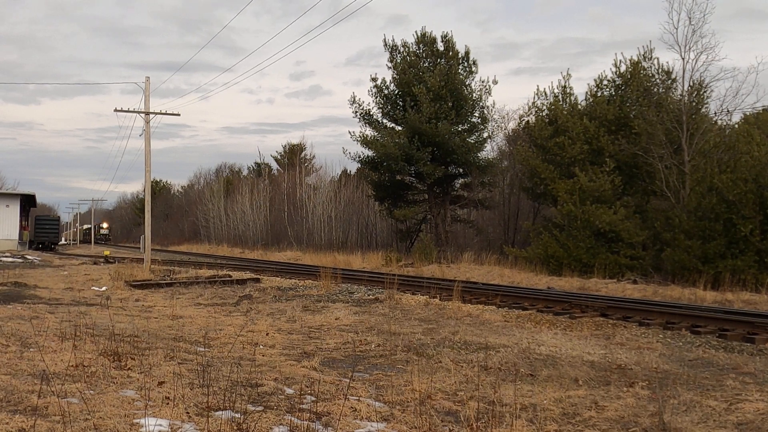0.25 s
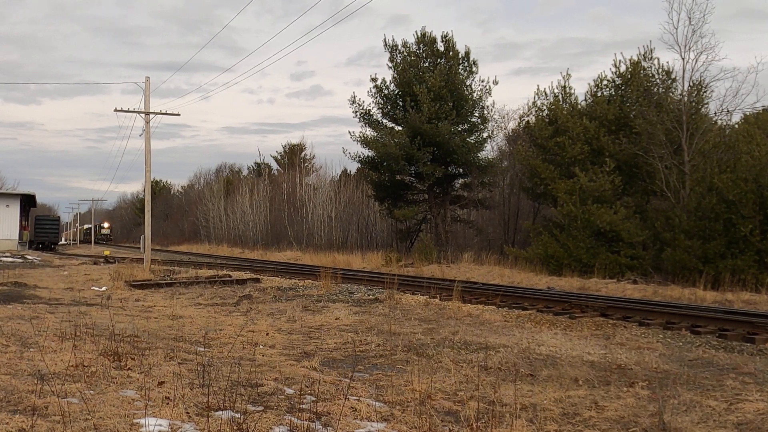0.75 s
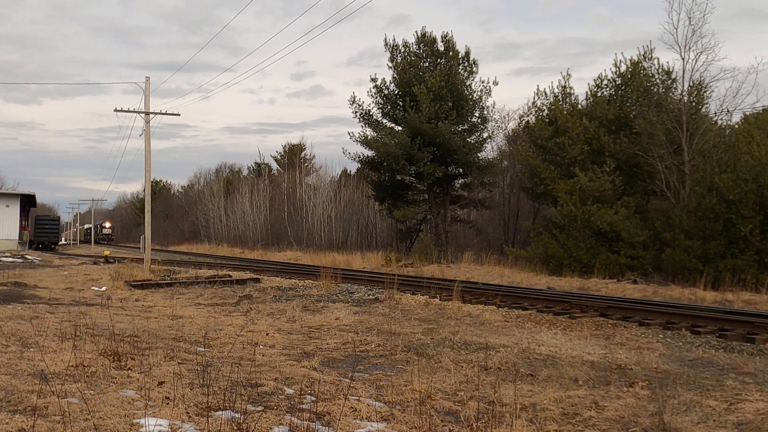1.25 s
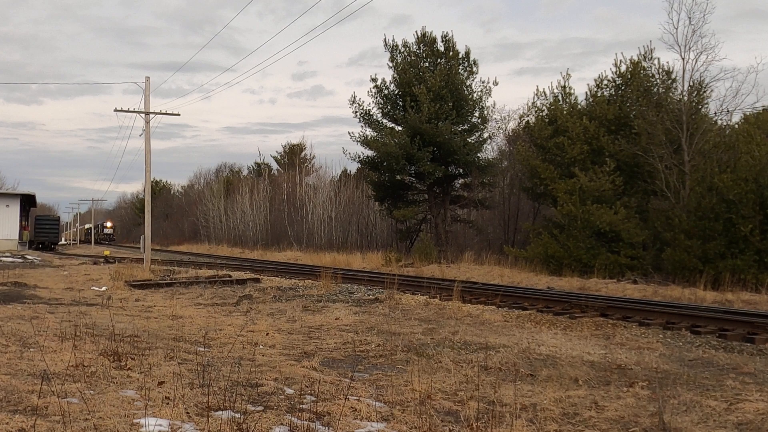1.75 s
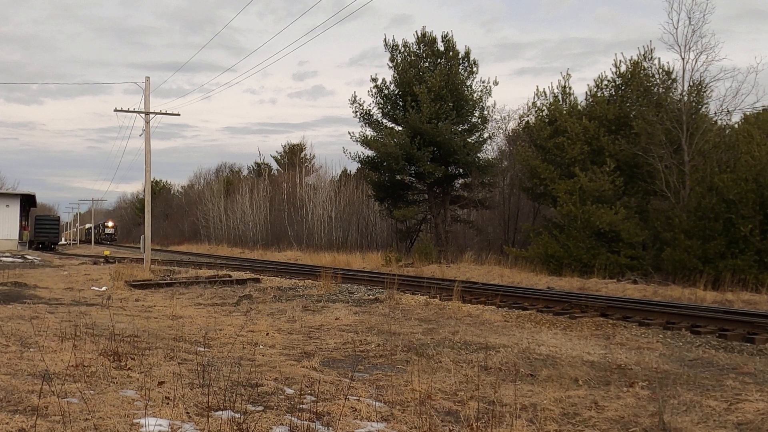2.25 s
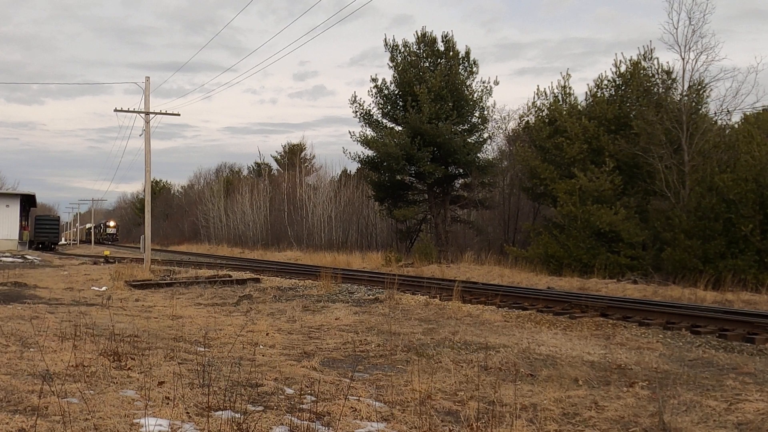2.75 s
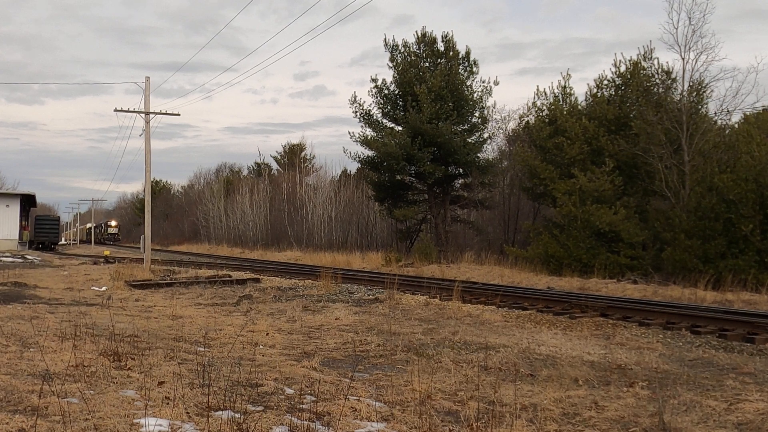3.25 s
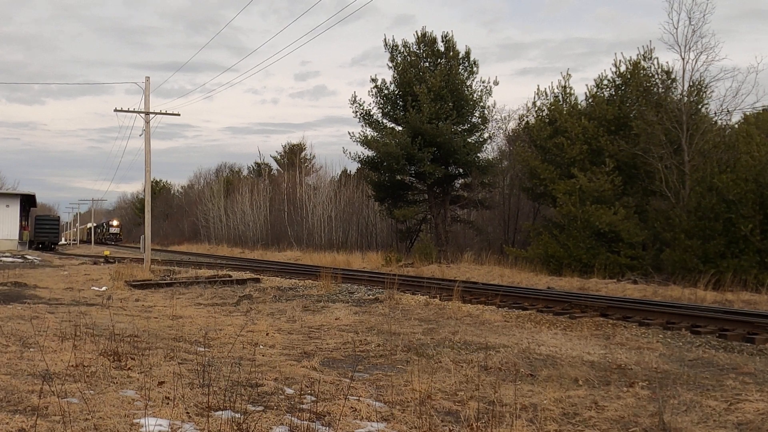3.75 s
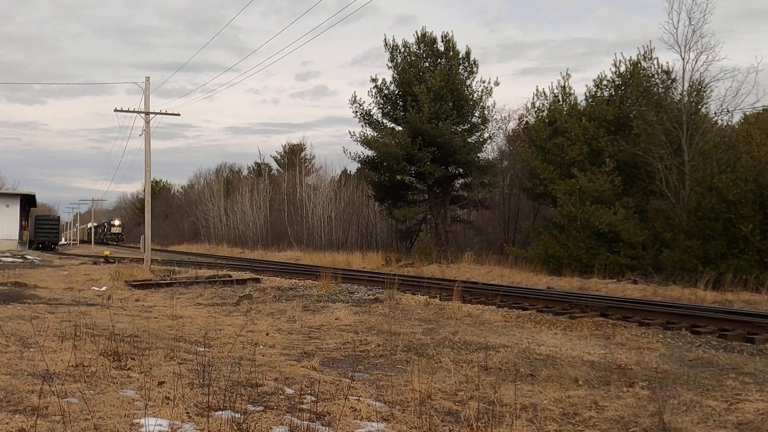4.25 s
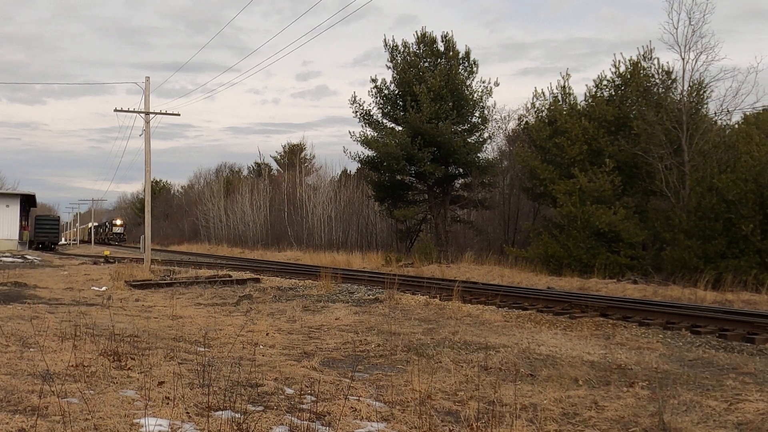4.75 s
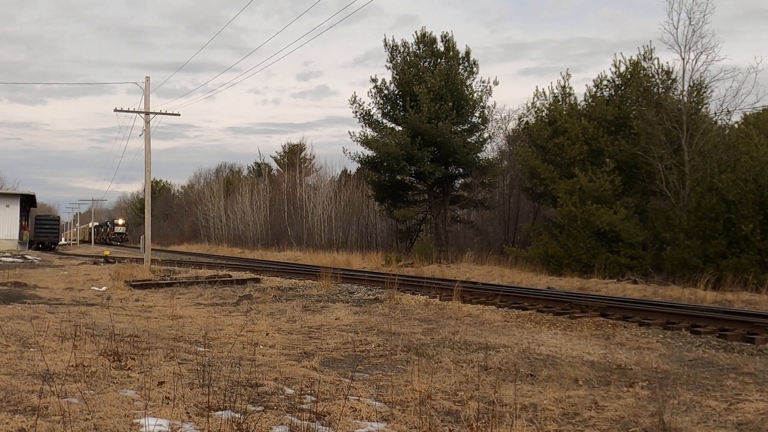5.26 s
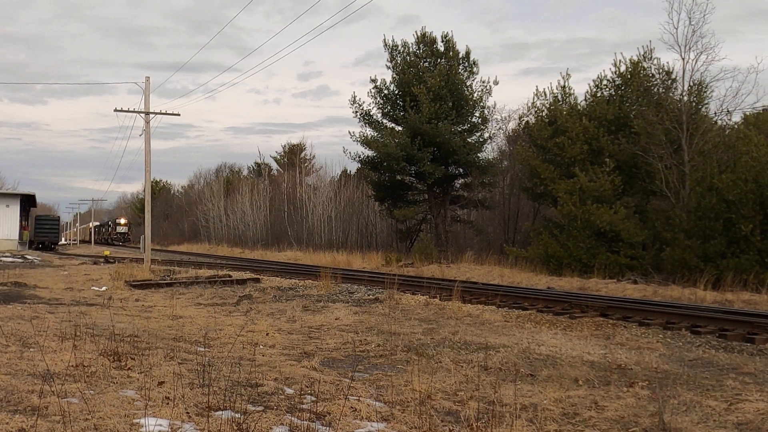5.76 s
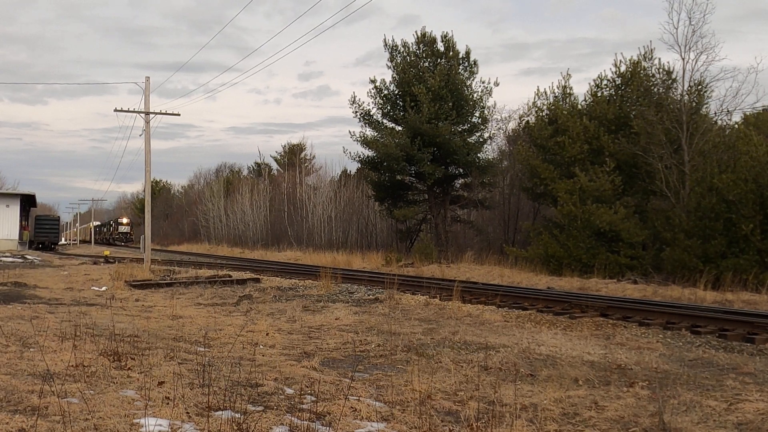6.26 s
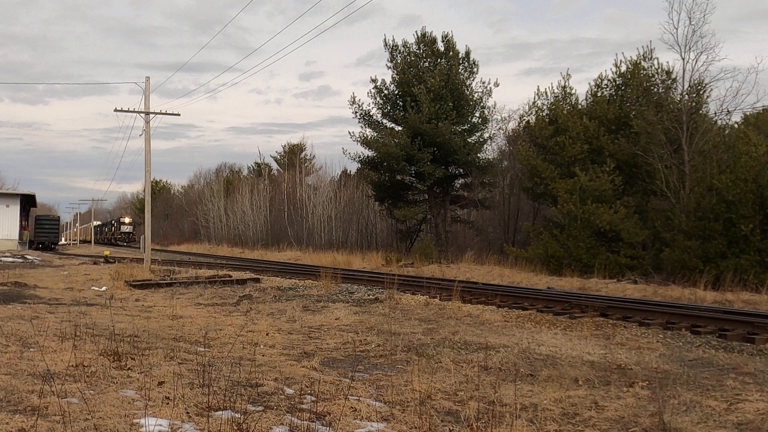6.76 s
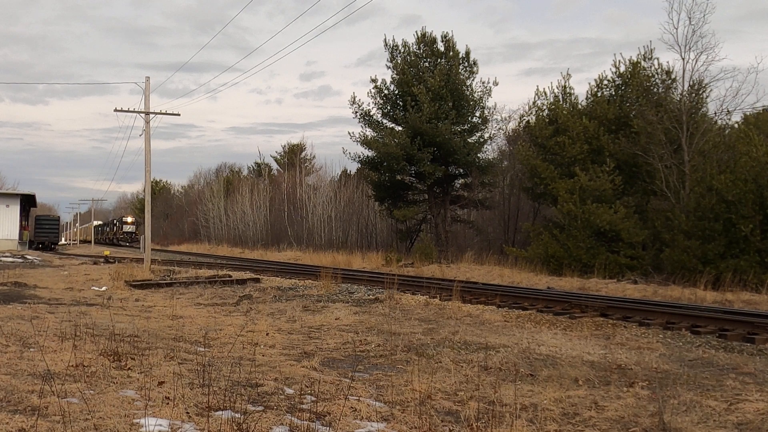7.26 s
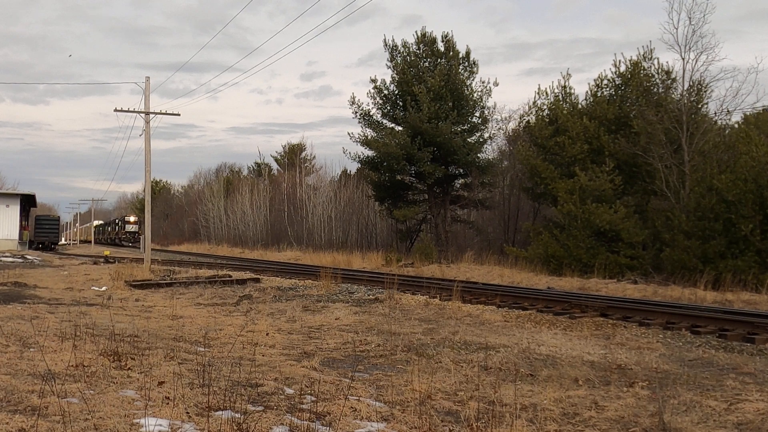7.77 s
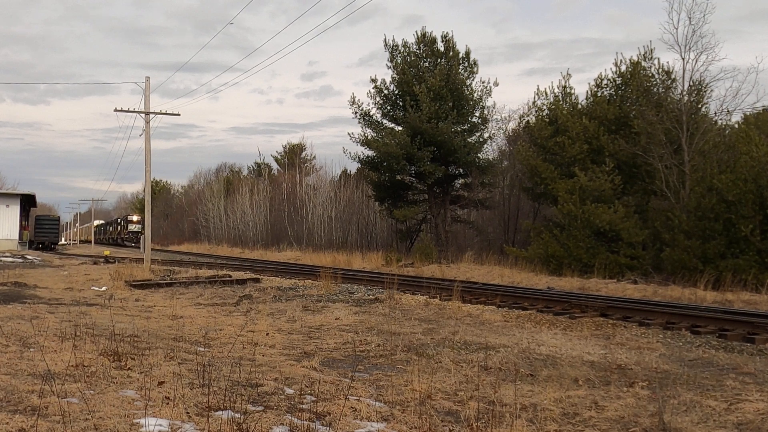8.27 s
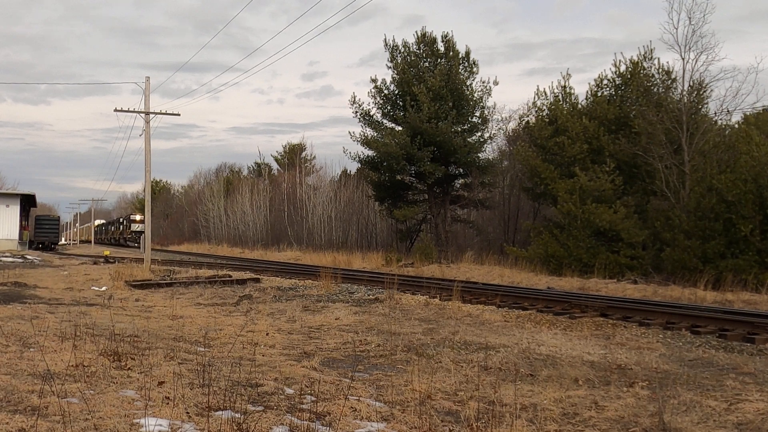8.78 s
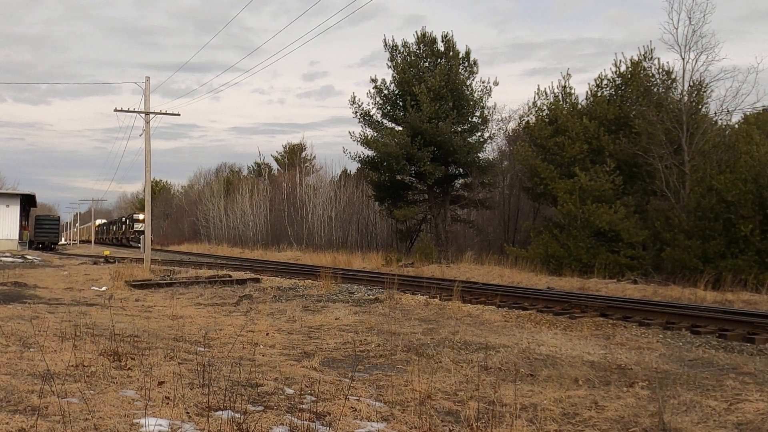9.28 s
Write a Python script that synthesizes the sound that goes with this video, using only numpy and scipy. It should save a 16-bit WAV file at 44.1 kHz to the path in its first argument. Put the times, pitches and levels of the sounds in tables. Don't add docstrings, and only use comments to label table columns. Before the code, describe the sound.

A deep throbbing diesel train engine rumble slowly nears across open ground, revs higher and beats, while wheels and running gear clack sharply.

```python
import sys
import numpy as np
from scipy import signal
from scipy.io import wavfile

SR = 44100
rng = np.random.default_rng(int(sys.argv[2]) if len(sys.argv) > 2 else 0)


def persist_wave(psi):
    counts = np.round(np.clip(psi, -1, 1) * 32767).astype(np.int16)
    wavfile.write(sys.argv[1], SR, np.atleast_2d(counts).T)


def convert_level_to_amplitude(level_db):
    exponent = np.asarray(level_db, float) / 20
    return 10 ** exponent


N = 419832


def rms_one(x):
    return x / np.sqrt(np.mean(x ** 2) + 1e-20)


def in_time(rows, t):
    s, *columns = np.transpose(rows)
    return [np.interp(t, s, column) for column in columns]


def at_hz(points, hz):
    points_hz, values = np.transpose(points)
    return np.interp(np.log(hz), np.log(points_hz), values)


def drift(rate, size):
    r = np.exp(-80 * np.pi * rate / SR)
    slow = signal.lfilter([1], [1, -2 * r, r * r], rng.standard_normal(N // 40 + 4000))[4000:]
    slow = rms_one(slow - slow.mean())
    return np.interp(np.linspace(0, len(slow) - 1, size), np.arange(len(slow)), slow)


# low notch in turns/s, high notch in turns/s, notch-up in s, hunting in rad/s, damping in 1/s,
# lead over the first unit in firings.
GOVERNORS = [
    (9.7707, 11.2347, 5.1628, 1.8962, 1.2736, 0),
    (9.8252, 10.9772, 5.6422, 2.3642, 1.5826, -.466),
    (9.3004, 10.4294, 5.6297, 2.1623, 4.3351, .97),
]
SETTLE_TURNS_PER_S, SETTLE_S = .19, 1.2


def governor(t, low, high, notch_s, hunting, damping):
    u = np.maximum(t - notch_s, 0)
    swing = np.cos(hunting * u) + damping / hunting * np.sin(hunting * u)
    step = 1 - np.exp(-damping * u) * swing
    creep = SETTLE_TURNS_PER_S * np.exp(-t / SETTLE_S)
    return low - creep + (high - low) * step, np.clip(step, 0, 1)


# time in seconds, clearness of the air path as treble in dB, engine strain in dB.
AIR = [(0, -65.5, 1.5), (.66, -64.5, 1), (1.22, -62.5, 0.2), (1.7, -65, -2), (2.68, -65, -0.1),
       (3.15, -64.5, -3.5), (3.6, -61, -1), (4.15, -60.5, -0.4), (5.05, -61, 0.5), (5.35, -59.5, 1),
       (5.8, -58.5, 4), (6.3, -58.5, 3), (6.75, -60.5, 0.2), (7.37, -58, -2.5), (8.15, -56, 2),
       (8.72, -59.5, -2), (9.2, -58, 1.1), (9.52, -59, -3.5)]
NEARING_DB_PER_S, ROAR_FOLLOWS_AIR, RUMBLE_NEARING = 0.61, 0.28, 0.19
LOW_STACK_STRAIN, LOW_STACK_CLEAR, HIGH_STACK_CLEAR = .8, .2, 0.83
HIGH_STACK_DETUNE_DB = 5.5
HIGH_STACK_THIRD = 0.31
SURGE_DB, SURGE_LAG_S = 1.5, .3


def swells(t):
    treble, strain = in_time(AIR, t)
    near = NEARING_DB_PER_S * (t - t.mean())
    clear = treble - treble.mean()
    lead = GOVERNORS[0][:-1]
    low_stack = LOW_STACK_STRAIN * strain + LOW_STACK_CLEAR * clear
    high_stack = HIGH_STACK_CLEAR * clear - HIGH_STACK_DETUNE_DB * governor(t, *lead)[1]
    high_stack = high_stack + HIGH_STACK_THIRD * in_time(THIRD, t)[0]
    low, top = lead[:2]
    overshoot = np.maximum(governor(t - SURGE_LAG_S, *lead)[0] - top, 0) / (top - low)
    level = near + ROAR_FOLLOWS_AIR * (clear - near) + SURGE_DB * 10 * overshoot
    return level, clear - level, RUMBLE_NEARING * near + strain, low_stack, high_stack - high_stack.mean()


COARSE = 20


def crank(speed, levels_db, starts, firings_ahead, shimmer_db, wander):
    angle = 2 * np.pi * (np.cumsum(speed) * COARSE / SR + firings_ahead / 8)
    out = 0
    for order, db in levels_db.items():
        flicker, slip = drift(0.49, size=len(speed)), drift(0.56, size=len(speed))
        loose = (order not in (6, 8, 10, 16, 24, 37)) * min(order / 16, 1)
        phase = order * angle + starts[order] * (order % 8 > 0) + wander * loose * slip
        out = out + np.sqrt(2) * convert_level_to_amplitude(db + shimmer_db * loose * flicker) * np.cos(phase)
    return out


# time in seconds, firing order in dB, unevenness of the two banks in dB.
LEAD = [(0, -22, -3), (1.2, -21.5, 2), (2.4, -19.5, -8), (3.0, -21, -4.5), (3.6, -23, -8.5),
        (4.2, -22, 3.5), (4.8, -22.5, 8), (5.2, -22, 7), (5.5, -29.5, -4), (5.8, -16, -3),
        (6.1, -25.5, 6.5), (6.4, -22.8, 7), (7.15, -27.5, 1.5), (7.45, -22, 4.5), (7.8, -24.5, 1.5),
        (8.3, -21.3, 2), (8.8, -22, -1.5), (9.52, -22, 4.5)]
# time in seconds, firing order in dB.
SECOND = [(4.7, -58), (5.1, -33.5), (5.4, -18.5), (5.7, -26.5), (5.899, -38.5), (6.7, -32.5), (7.15, -28),
          (7.45, -23.5), (7.8, -25), (8.3, -22.5), (9.52, -27.5)]
# time in seconds, firing order in dB.
THIRD = [
    (0, -52),
    (2.7, -45.5),
    (3.6, -44.5),
    (5.299, -42.5),
    (5.7, -41),
    (6.3, -35),
    (6.8, -36.5),
    (7.4, -45),
]
# crank order, lead in low notch in dB, lead in high notch in dB, trailing units in dB.
ORDER_LEVELS = [(2, -53, -41, -41), (3, -48, -42, -48), (4, -37, -35, -36), (5, -39, -41, -47),
                (6, -37, -32, -33), (7, -41, -48, -51), (8, -21, -22, -24), (10, -37, -41, -36),
                (13, -47, -38, -50), (14, -52, -37, -46), (15, -53, -41, -44), (16, -31, -34, -43),
                (17, -41, -55, -41), (18, -49, -38, -51), (19, -40, -41, -55), (20, -47, -42, -41),
                (21, -51, -41, -46), (22, -42, -48, -43), (23, -42, -53, -54), (24, -37, -46, -51),
                (25, -43, -60, -54), (37, -48, -66, -59), (40, -58, -68, -74)]
FAINT_DB, FAINT_KNEE_ORDER, FAINT_FALL_DB, FAINT_SPREAD_DB = -50, 26, 12, 2.5
SPINUP_DIP_DB = 1.5
BARK_BELOW_DB, BARK_UNTIL_S = 2.5, 0.73
IDLER_HZ, IDLER_DB, IDLER_THROB_S, IDLER_HUSH_S = 35.1, -32, 1.88, 0.83


def engines():
    t = np.arange(N // COARSE + 1) * COARSE / SR
    speed, notch = governor(t, *GOVERNORS[0][:-1])
    firing_db, uneven_db = in_time(LEAD, t)
    low_stack_db, high_stack_db = swells(t)[-2:]
    orders = {}
    for k in range(2, 41):
        faint_db = FAINT_DB - FAINT_FALL_DB * (k > FAINT_KNEE_ORDER)
        orders[k] = faint_db + FAINT_SPREAD_DB * rng.standard_normal(3)
    orders.update({row[0]: row[1:] for row in ORDER_LEVELS})

    levels = {}
    for k, (low, high, _) in orders.items():
        stack_db = low_stack_db * (20 < k <= 30) + high_stack_db * (k > 30)
        levels[k] = low + notch * (high - low) + stack_db + uneven_db * (k in (6, 10))
    levels[8] = firing_db
    weak_start_db = BARK_BELOW_DB / (1 + (t / BARK_UNTIL_S) ** 6)
    levels[16] = levels[16] - SPINUP_DIP_DB * np.gradient(speed, t) - weak_start_db
    starts = rng.uniform(0, 2 * np.pi, 64)
    drone = crank(speed, levels, starts, 0, shimmer_db=2.0, wander=0.87)

    for unit, (*setting, ahead) in zip((SECOND, THIRD), GOVERNORS[1:]):
        unit_db = in_time(unit, t)[0]
        levels = {k: unit_db + db[2] - orders[8][2] for k, db in orders.items()}
        drone += crank(governor(t, *setting)[0], levels, starts, ahead, shimmer_db=4.0, wander=0.76)

    throb = np.sin(np.pi * (t - IDLER_HUSH_S) / IDLER_THROB_S)
    drone += np.sqrt(2) * convert_level_to_amplitude(IDLER_DB) * throb * np.sin(2 * np.pi * IDLER_HZ * t)
    angle = np.interp(np.arange(N) / SR, t, 2 * np.pi * np.cumsum(speed) * COARSE / SR)
    return signal.resample_poly(drone, COARSE, 1, padtype="line")[:N], angle


def resonate(x, hz, width_hz):
    r = np.exp(-np.pi * width_hz / SR)
    zeros = np.array([1, 0, -1]) * (1 - r * r) / 2
    return signal.lfilter(zeros, [1, -2 * r * np.cos(2 * np.pi * hz / SR), r * r], x)


# frequency in Hz, left-right likeness from 0 to 1.
LIKENESS = [(60, .8), (210, .9), (390, .93), (740, .8), (1380, .86), (2580, .84), (4840, .72), (8000, .6),
            (12000, .9)]
# frequency in Hz, left over right in dB.
LEFT_OVER_RIGHT = [(60, 8.5), (98, 3.5), (160, 1.5), (260, 5), (420, 0), (690, 0.5), (1120, -0.5),
                   (1820, 2.5), (2970, 3.5), (4840, 0)]
# frequency in Hz, lateness at the left capsule in samples.
LEFT_LAG = [(900, 1), (1800, 2), (3200, 2), (4500, 1), (7000, 0)]


def banded_noise(spectrum, tilt_db, patchy_db):
    out, together = 0, drift(12, size=N)
    flip = np.array([[1], [-1]])
    first_hz, last_hz = spectrum[0][0], spectrum[-1][0]
    edges = first_hz * 2 ** np.arange(0, np.log2(last_hz / first_hz), .34)
    white = rng.standard_normal((2, 2, N))
    for k, (low, high) in enumerate(zip(edges, edges[1:])):
        band = signal.butter(2, [low, high], "band", fs=SR, output="sos")
        mid, side = signal.sosfilt(band, white[k % 2])
        hz = np.sqrt(low * high)
        alike = np.clip(at_hz(LIKENESS, hz) + 0.064, 0, 1)
        treble = np.clip(np.log2(hz / 1500) / 1.2, 0, 1.5)
        db = at_hz(spectrum, hz)
        if treble:
            flicker = together + 1.6 * drift(34, size=N)
            db = db + treble * (tilt_db + patchy_db * flicker)
        pan = convert_level_to_amplitude(at_hz(LEFT_OVER_RIGHT, hz) / 2 * flip)
        left, right = convert_level_to_amplitude(db) * pan * (np.sqrt(1 + alike) * mid + np.sqrt(1 - alike) * side * flip)
        out = out + np.array([np.roll(left, round(at_hz(LEFT_LAG, hz))), right])
    return rms_one(out)


# frequency in Hz, density in dB per Hz.
RUMBLE = [(15, -12.5), (30, -12), (60, -1), (100, 4.5), (130, -4), (230, -0.5), (300, -10), (370, -10),
          (450, -14.5), (600, -24)]
# frequency in Hz, density in dB per Hz.
HISS = [(350, -7.5), (600, -1.5), (1500, -1), (2200, -6), (3200, -9), (5000, -23), (6500, -30.5),
        (8000, -52), (9500, -64), (16000, -56.5)]
# frequency in Hz, width in Hz, level in dB.
HOLLOWS = [
    (228.2, 23, -38.5),
    (362, 23, -49),
    (505, 53, -54),
    (735.6, 49, -59),
    (895, 60, -67.5),
    (1134.5, 43, -59),
    (1485, 230, -56),
]
ROAR_DB, RUMBLE_DB = -45.5, -34.5


def roar(angle):
    level_db, bright_db, rumble_db, low_stack_db, high_stack_db = swells(np.arange(N) / SR)
    puffs_db = .7 * np.cos(8 * angle) + .6 * np.cos(angle)
    hiss = convert_level_to_amplitude(ROAR_DB + level_db + 1.5) * banded_noise(HISS, bright_db + puffs_db, patchy_db=.7)
    air = rng.standard_normal(N)
    lifts = [low_stack_db, high_stack_db] + [level_db] * (len(HOLLOWS) - 2)
    hollows = 0
    for (hz, width, db), lift in zip(HOLLOWS, lifts):
        ring = resonate(resonate(air, hz, width), hz, width)
        hollows = hollows + convert_level_to_amplitude(db + lift) * rms_one(ring)
    return hiss + convert_level_to_amplitude(RUMBLE_DB + rumble_db) * banded_noise(RUMBLE, 0, patchy_db=0) + hollows


# start in seconds, length in seconds, level in dB, upward hook at the end in Hz.
CHIPS = [
    (.085, .022, -70, 0.0),
    (4.488, .048, -57.5, 1000),
]
# start in seconds, length in seconds, level in dB, upward hook at the end in Hz.
SLURS = [
    (.26, .23, -81, 4),
    (4.615, .25, -77, 250),
]
CHIP_FROM_HZ, CHIP_TO_HZ, CHIP_FALL = 9800, 7300, .24
SLUR_FROM_HZ, SLUR_TO_HZ, SLUR_FALL = 9200, 8120, .1
SLUR_BREAK, SLUR_BREAK_WIDTH, SLUR_BREAK_DB = .5, .1, 7
HOOK_SHARE = .1


def bird():
    out = np.zeros(N)
    kinds = ((CHIPS, CHIP_FROM_HZ, CHIP_TO_HZ, CHIP_FALL, 0),
             (SLURS, SLUR_FROM_HZ, SLUR_TO_HZ, SLUR_FALL, SLUR_BREAK_DB))
    for notes, from_hz, to_hz, fall, catch_db in kinds:
        for s, length, db, hook_hz in notes:
            share = np.linspace(0, 1, round(length * SR))
            hook = hook_hz * np.exp((share - 1) / HOOK_SHARE)
            hz = to_hz + (from_hz - to_hz) * np.exp(-share / fall) + hook
            db = db - catch_db * np.exp(-((share - SLUR_BREAK) / SLUR_BREAK_WIDTH) ** 2)
            shape = np.sin(np.pi * share) ** .5 if catch_db else np.sin(np.pi * share ** 1.4) ** 2
            whistle = np.sin(2 * np.pi * np.cumsum(hz) / SR)
            out[round(s * SR):][:len(share)] += np.sqrt(2) * convert_level_to_amplitude(db) * shape * whistle
    out *= convert_level_to_amplitude(3.5 * drift(60, size=N))
    return out + convert_level_to_amplitude(-14.5) * np.roll(out, round(.011 * SR))


def strikes(events, t60, width_hz, gain_db):
    out, t = np.zeros(N), np.arange(2000) / SR
    for s, db, hz in events:
        band = signal.butter(2, [max(hz - width_hz, 500), hz + width_hz], "band", fs=SR, output="sos")
        ring = signal.sosfilt(band, rng.standard_normal(len(t)))
        burst = ring * convert_level_to_amplitude(-60 * t / t60) * np.minimum(t / 0.00048, 1)
        i = round(s * SR)
        out[i:i + len(t)] += (convert_level_to_amplitude(db + gain_db) * burst / np.abs(burst).max())[:N - i]
    return out


# start in seconds, peak in dB, ring in Hz.
TICKS = [
    (.428, -65.5, 5320),
    (2.258, -57.5, 5920),
    (2.568, -58, 6000),
    (5.867, -62, 7250),
    (5.923, -49, 7200),
    (6.447, -60, 6600),
    (6.465, -48.5, 7120),
]


def ticks():
    return strikes(TICKS, t60=0.039, width_hz=720, gain_db=3.5)


# start in seconds, peak in dB.
KNOCKS = [(2.2593, -45), (3.6928, -46.5), (4.128, -43), (4.3113, -41.5), (4.8207, -43), (5.3078, -41),
          (5.5437, -53), (5.8671, -38), (5.9248, -41), (6.0623, -55), (7.26, -44), (7.3338, -39),
          (7.7846, -48)]
# start in seconds, peak in dB, gap in seconds, second minus first in dB.
DOUBLES = [
    (5.4357, -50, 0.022, 5),
    (5.632, -44.5, 0.022, 6.5),
    (5.7544, -49, 0.037, 5),
    (6.4463, -48, 0.018, 4),
    (7.652, -41, .042, 1.1),
    (7.9206, -43, .034, 6),
    (8.1338, -39.5, 0.035, -8),
    (8.2772, -39.5, 0.036, -8),
    (8.757, -42.5, 0.048, 0),
]
KNOCK_HZ = 4200


def running_gear():
    first = [(s, db) for s, db, _, _ in DOUBLES]
    second = [(s + gap, db + more) for s, db, gap, more in DOUBLES]
    blows = [(s, db, KNOCK_HZ) for s, db in KNOCKS + first + second]
    knocks = strikes(blows, t60=0.04, width_hz=870, gain_db=-3.5)
    return np.array([np.roll(knocks, 1) * convert_level_to_amplitude(4.0), knocks * convert_level_to_amplitude(-1.0)])


def scene():
    drone, angle = engines()
    near_middle = convert_level_to_amplitude(np.array([[.3], [-.3]]))
    near = bird() + ticks()
    return drone * near_middle + roar(angle) + running_gear() + near * near_middle


def top_cut(x):
    return signal.sosfilt(signal.butter(12, 15460, fs=SR, output="sos"), x)


def record(dry):
    fade = np.minimum(np.arange(N)[::-1] / 200, 1)
    mix = fade * 0.84 * np.tanh(1.051 * dry / 0.79)
    return top_cut(mix)


dry = scene()
out = record(dry)
persist_wave(out)
```